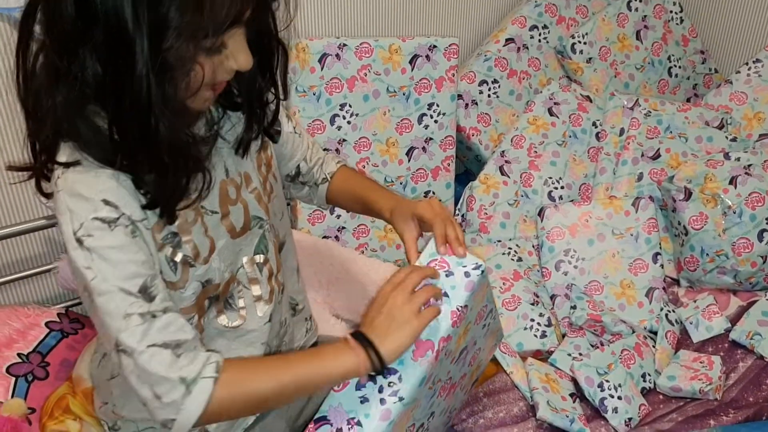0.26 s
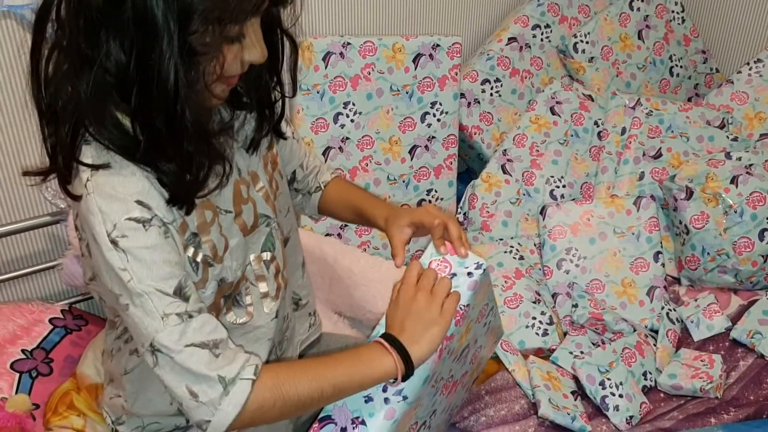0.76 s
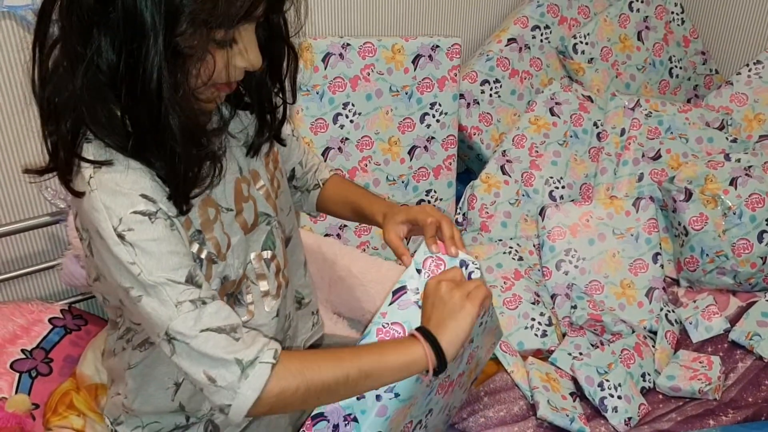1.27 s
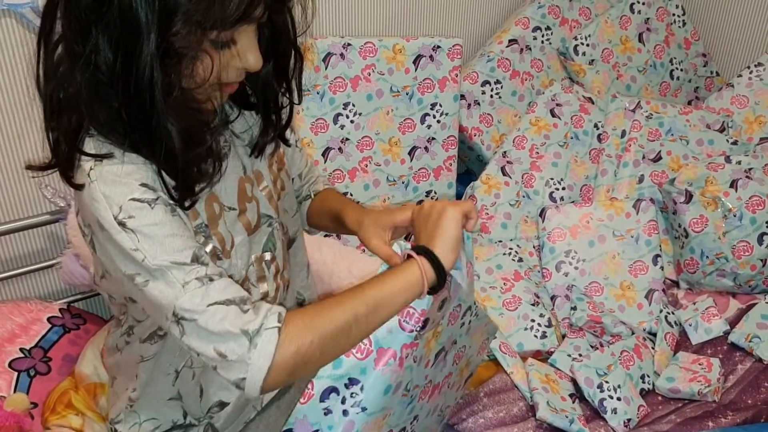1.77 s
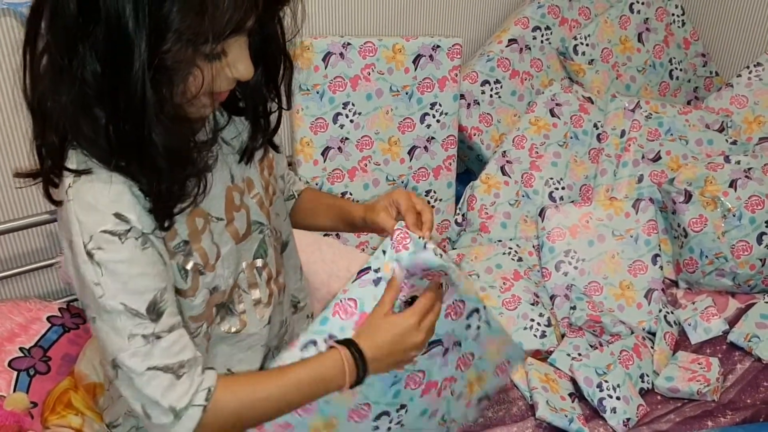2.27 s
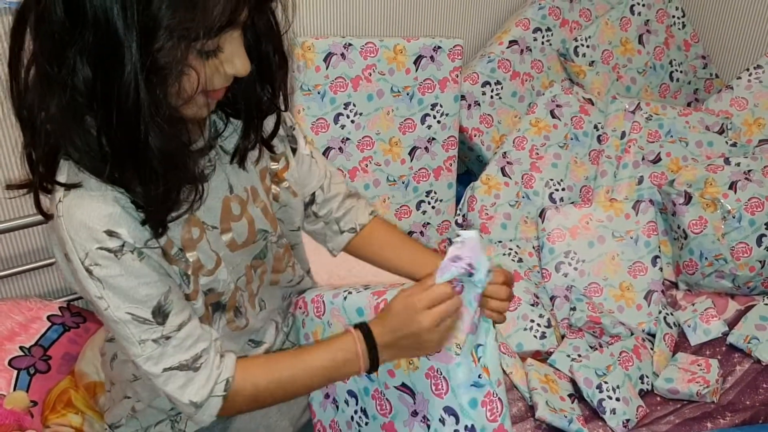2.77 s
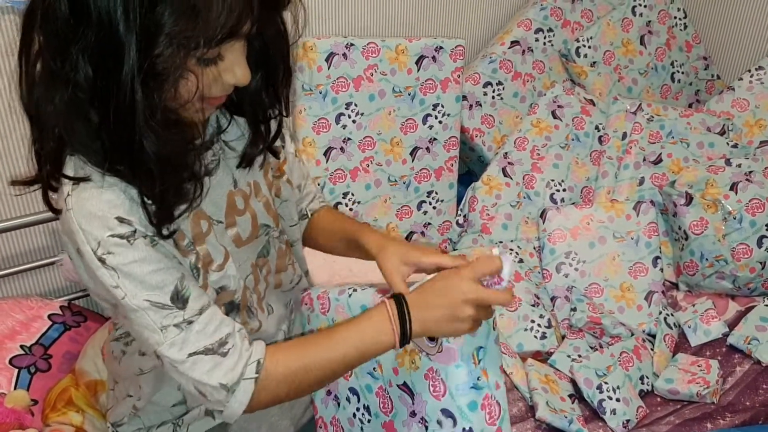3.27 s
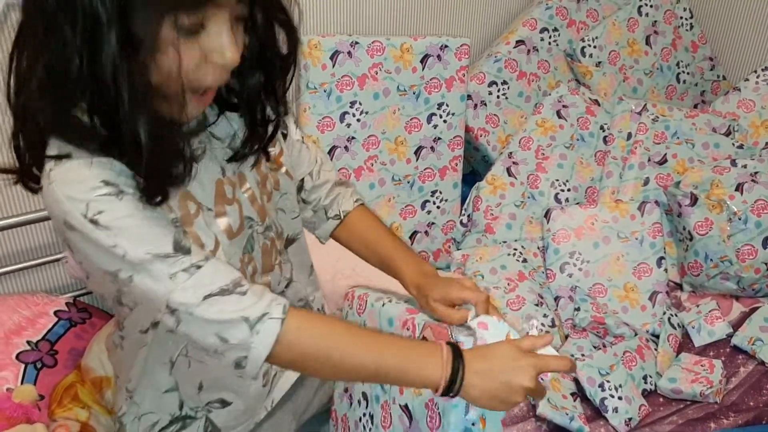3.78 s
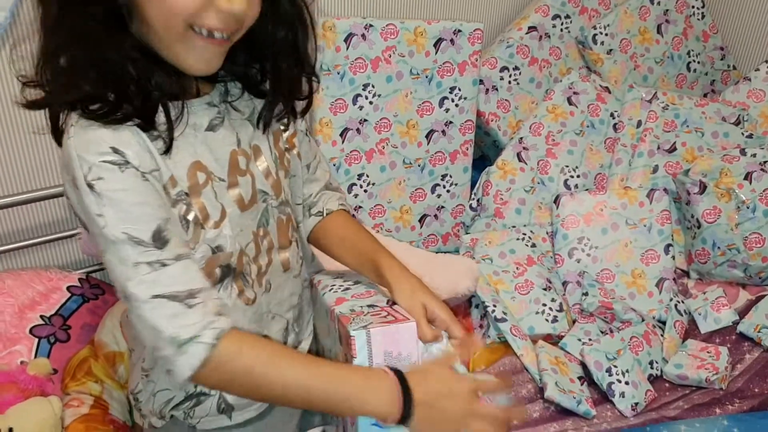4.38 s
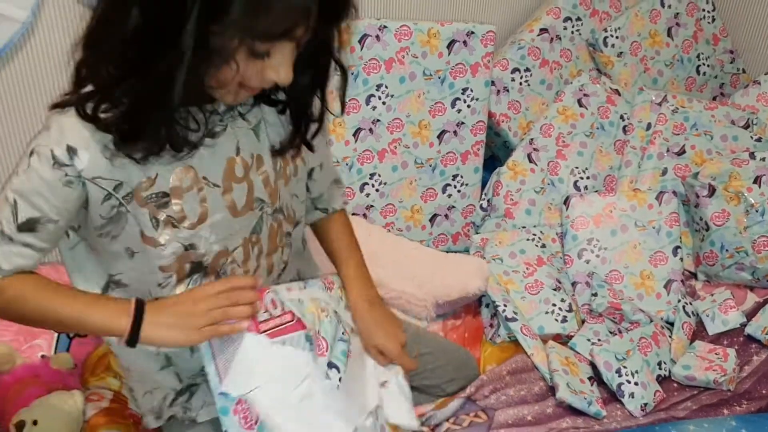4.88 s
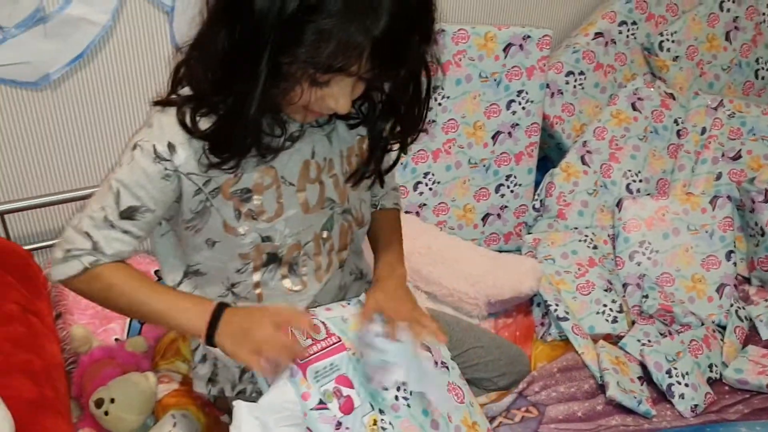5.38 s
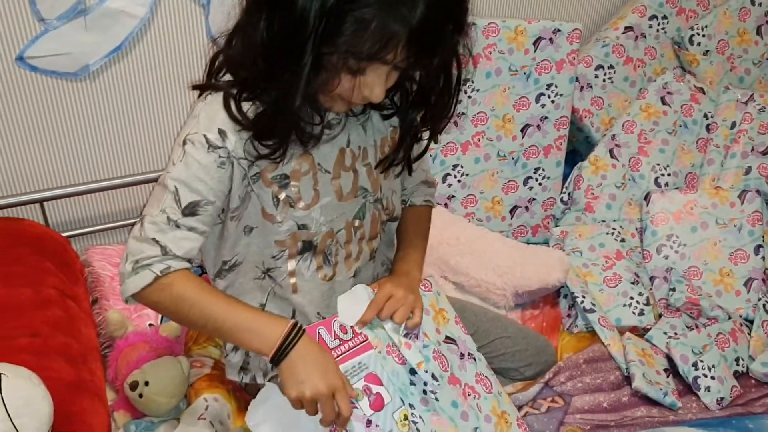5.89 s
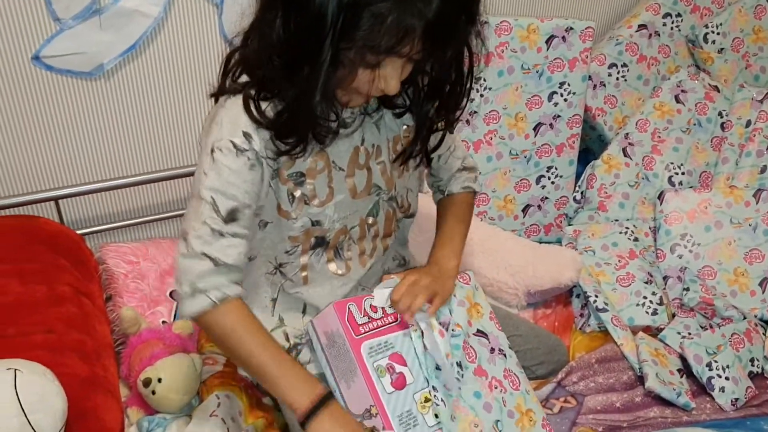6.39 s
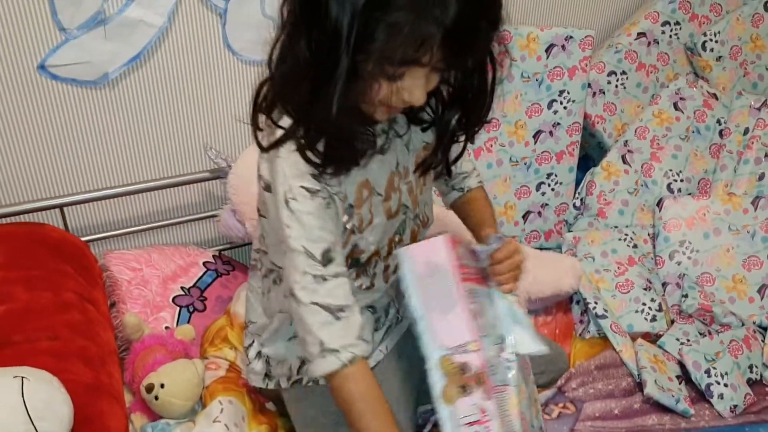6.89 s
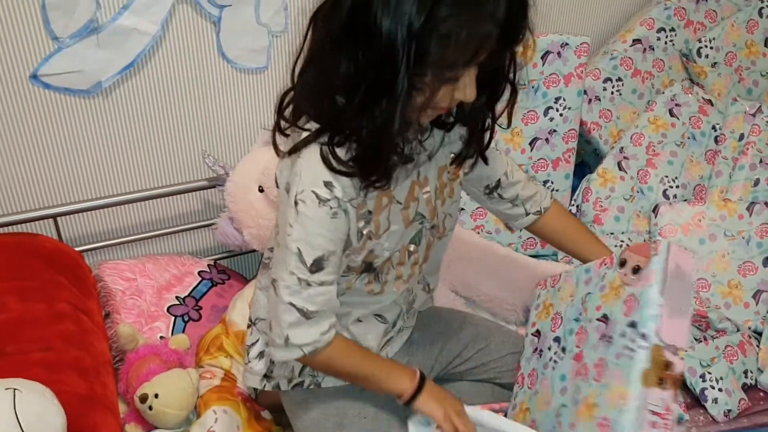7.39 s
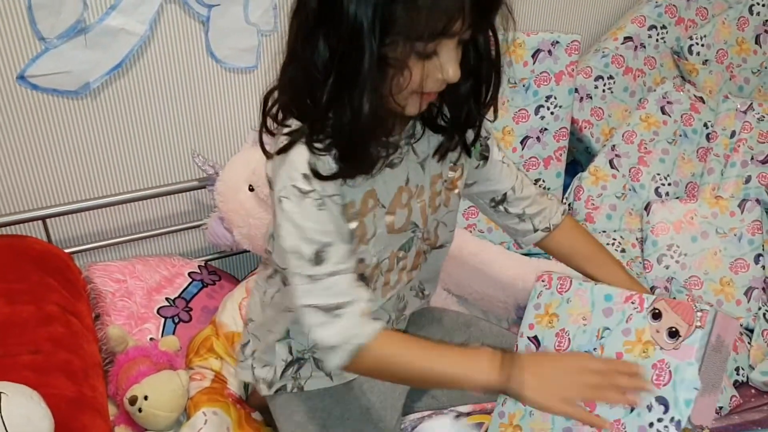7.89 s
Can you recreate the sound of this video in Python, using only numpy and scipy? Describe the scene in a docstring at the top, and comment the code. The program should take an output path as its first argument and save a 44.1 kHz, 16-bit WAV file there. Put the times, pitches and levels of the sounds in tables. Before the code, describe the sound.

Gift paper tears in irregular pulls: a few early rips, scattered pops and crumples, a big fierce rip halfway through, a quieter lull, then busy crackling and snaps before it thins out to small rustles and light taps on a stiff lid. Muffled box knocks lie underneath. Recorded near in stereo, very dry room with a short soft reverberation and low background hiss.

```python
"""Tearing gift paper off a box

Hands tear and crumple gift paper off a cardboard box in a soft-furnished bedroom. Breaking fibres are
trains of tiny impulses filtered to the colours of paper; snaps are short decaying tones with a sharp edge.
The hollow box booms as a set of resonances under the fingers, and the stiff lid rings when tapped.
A brief decaying room answer, a steady hush and a fading hum lie beneath, heard at two microphone ports."""
import sys
import numpy as np
from scipy import signal
from scipy.fft import rfft, irfft, next_fast_len
from scipy.io import wavfile
from scipy.ndimage import uniform_filter1d, map_coordinates

SR = 44100
rng = np.random.default_rng(int(sys.argv[2]) if len(sys.argv) > 2 else 0)


def inscribe(sig):
    """Save sig as 16-bit PCM at rate SR to the path in sys.argv[1].

    A 1-D sig is mono; a 2-D sig holds one channel per row.
    Samples are clipped to [-1, 1] before scaling.
    """
    pcm = np.round(np.clip(np.atleast_2d(sig).T, -1, 1) * 32767)
    wavfile.write(sys.argv[1], SR, pcm.astype(np.int16))


N = 358533

# Resonances of the hollow carton at rest.
# Each row: centre in Hz, undamped width in Hz, nominal level in dB.
BOX = [(103, 21, -4), (212.3, 23.5, -2.5), (300, 22, 0.5), (369, 46, -2.5), (461, 133, -7)]


def tearing():
    """Stick-slip fracture: the tear runs in jerks, and a strong pull packs its breaks more densely."""
    # Spectra of the crackle, the torn edge and the broad folds.
    # Each row: frequency in Hz, relative level per Hz in dB.
    paper_colour = [(1500, -29), (2500, -7), (3500, -3.5), (5000, -5), (7500, -8.5), (12000, -40)]
    fibre_colour = [(4000, -23.5), (7000, -3.5), (9000, -5.5), (12000, -2), (15500, -8)]
    fold_colour = [(450, -54), (750, -4.5), (1300, -0.5), (2200, -2), (3200, -51)]
    effort_s, light_db, packing = 0.1, -53, 0.29  # breaks pack closer above light_db
    crinkle_db = -6.5  # over the crackle, before jerks and packing

    crackle, fibres, folds, box = handling()
    effort_db = uniform_filter1d(20 * np.log10(crackle), round(effort_s * SR))
    dense = amp(packing * (effort_db - light_db))
    jerk_db = (6.1 * slips(55) + 1.7 * wobble(140)) / (1 + 1.15 * dense)
    jerk = amp(jerk_db)

    def breaks(colour, count, spread_db, smooth):
        train = jerk * cracks(count, spread_db, smooth)
        return unit(filtered(train, lambda hz: amp(along(colour, hz))))

    sheet = breaks(paper_colour, count=9000, spread_db=3.0, smooth=0.84 * dense)
    edge = breaks(fibre_colour, count=7000, spread_db=2.0, smooth=0.68 * dense)
    fold = breaks(fold_colour, count=5000, spread_db=5.0, smooth=1.44 * dense)
    body = boom(jerk * cracks(count=3000, spread_db=2.5, smooth=0.28))
    torn = patchy(crackle * sheet + fibres * edge + folds * fold, patch_db=1.64)
    crinkle_gain = crackle * amp(crinkle_db + jerk_db) / np.sqrt(1 + dense)
    return torn + box * body + crinkle_gain * crinkles(count=1500)


def handling():
    """Incoherent sources add in power: gains of crackle, fibres, folds and box, pulls over rustle."""
    # Pulls on the paper. Each row: start in seconds, rise in seconds (at least 1 ms), hold in seconds,
    # crackle level in dB, then relative to the crackle: thin fibres, broad folds and box, all in dB.
    pulls = [(0.165, 0.022, 0.0095, -43.5, -10, -13, -9.5), (0.36, 0.037, 0.16, -32, -0.5, -14.5, -18),
             (0.819, 0.0091, 0.13, -30, -1, -12.5, -20), (1.166, 0.003, 0.044, -44, 1, -11, -25),
             (1.259, 0.0049, 0.021, -32.5, 0, -7.5, -28), (1.383, 0.0058, 0.0055, -28.5, 3.5, -6.5, -20),
             (1.427, 0.013, 0.09, -30.5, -0.5, -12.5, -23), (1.485, 0.081, 0.093, -26.5, 2, -12, -18),
             (1.856, 0.0044, 0.029, -43, -6, -3, -14), (1.944, 0.0017, 0.003, -40.5, -4.5, -3.5, -2.5),
             (1.992, 0.044, 0.11, -49, -4.5, -5.5, -6), (2.214, 0.003, 0.008, -35.5, -7, -6, -10.5),
             (2.257, 0.003, 0.11, -38, -4, -7.5, -11.5), (2.336, 0.14, 0.02, -34, 1.5, -5.5, -6),
             (2.554, 0.011, 0.006, -29.5, -1.5, -8.5, -12.5), (2.832, 0.091, 0.01, -37.5, -1.5, -7, -18),
             (2.975, 0.034, 0.13, -36, -3.5, -12, -19.5), (3.297, 0.016, 0.038, -36.5, 2.5, -7.5, -33),
             (3.41, 0.013, 0.028, -37.5, -4, -8.5, -28), (3.539, 0.0077, 0.014, -28, 2, -8, -13),
             (3.562, 0.016, 0.18, -36.5, 0.5, -8.5, -9.5), (3.761, 0.086, 0.19, -32, -1.5, -12, -21),
             (4.054, 0.021, 0.039, -39, -3, -0.5, -6.5), (4.216, 0.0062, 0.0066, -34, -3, -6, -11.5),
             (4.374, 0.019, 0.015, -36.5, -2, -9, -21), (4.515, 0.008, 0.034, -39.5, -3, -6.5, -11.5),
             (4.542, 0.049, 0.047, -19, 0, -7, -15), (4.627, 0.016, 0.16, -29.5, 1.5, -9.5, -18),
             (4.723, 0.051, 0.11, -23.5, 0, -13.5, -18.5), (4.891, 0.034, 0.083, -28.5, 1.5, -15, -16.5),
             (5.476, 0.055, 0.078, -39, -4, -8.5, -14.5), (5.64, 0.042, 0.036, -40.5, -2, -4, -12.5),
             (5.94, 0.092, 0.16, -37, -1.5, -24, -9.5), (6.19, 0.056, 0.16, -34.5, 1.5, -7.5, -14),
             (6.32, 0.044, 0.011, -30.5, 2.5, -9, -15.5), (6.388, 0.054, 0.083, -31.5, 3.5, -11.5, -26),
             (6.474, 0.082, 0.11, -26, -0.5, -10, -15), (6.673, 0.026, 0.33, -36.5, 4.5, -7, -12),
             (7.003, 0.11, 0.14, -30.5, 4, -7, -10), (8.009, 0.0065, 0.13, -42, 4, -10.5, -10)]
    # The sheet shifting between pulls. Each row: time in seconds, crackle level in dB,
    # thin fibres over that crackle in dB.
    rustle_points = [(0, -49, -9), (.12, -70.5, -8), (.3, -52, -13), (.7, -50, 0.5), (1.05, -70, -10),
                     (1.2, -60, -13), (1.75, -41, -6), (2.15, -109, 8), (2.7, -48, -5), (3.3, -46, -6),
                     (4.3, -46.5, -4), (5.1, -46.5, 1.5), (5.45, -58, 0), (5.9, -44.5, -6.5),
                     (7.35, -53, -6), (7.8, -53.5, -1), (7.98, -70, 11.5)]
    folds_db, box_db = -6.5, -8.5  # over the rustle's crackle
    release_db_per_s = 280  # every pull dies away alike once the fingers stop

    t = np.arange(N) / SR
    times, *columns = np.transpose(rustle_points)
    rustle_db, fibres_db = (np.interp(t, times, c) for c in columns)
    levels_db = [rustle_db, rustle_db + fibres_db, rustle_db + folds_db, rustle_db + box_db]
    power = amp(levels_db) ** 2
    for start, rise, hold, db, *shares_db in pulls:
        first = round(start * SR)
        since = t[first:][:SR] - start
        rise = max(rise, .001)
        swell = np.clip(since / rise, 0, 1) ** 2
        release = amp(-release_db_per_s * np.clip(since - rise - hold, 0, 1))
        gains = amp(db + np.r_[0, shares_db])
        power[:, first:][:, :SR] += np.outer(gains, swell * release) ** 2
    return np.sqrt(power)


def slips(rate):
    """Relaxation after random slips (rate a second): a log curve of mean 0 and rms 1."""
    slip_s = 0.013  # time constant: each slip starts at once and fades exponentially
    kicks = (rng.random(N) < rate / SR) * rng.exponential(size=N)
    fading = filtered(kicks, lambda hz: 1 / (1 / (slip_s * SR) + 2j * np.pi * hz / SR))
    x = np.log(0.58 + fading.clip(0))
    return unit(x - x.mean())


def cracks(count, spread_db, smooth):
    """Impulsive fracture noise: unequal breaks reach the ports apart in time; smooth adds steady noise."""
    lead_s = .00014  # widest lead of one port over the other
    u = rng.random((count, 4))
    sign = np.sign(u[:, 1] - .5)
    size = sign * amp(-spread_db * np.log(1 - u[:, 2]).clip(-4.2, 0))
    lag = (u[:, 3] - .5) * lead_s * SR
    at = [np.clip(u[:, 0] * N + side * lag, 0, N - 1).astype(int) for side in (1, -1)]
    train = unit(np.array([np.bincount(i, size, N) for i in at]))
    return (train + smooth * rng.standard_normal((2, N))) / np.sqrt(1 + smooth ** 2)


def patchy(x, patch_db):
    """Time-varying spectrum: different patches of the sheet sound, so the colour keeps shifting."""
    z = signal.stft(x, nperseg=256)[2]
    field = rng.standard_normal(z.shape[1:])
    field = uniform_filter1d(uniform_filter1d(field, 7, 0), 9, 1)
    return signal.istft(z * amp(patch_db * unit(field)), nperseg=256)[1][:, :N]


def crinkles(count):
    """Buckling of scattered small creases: damped tones at their own pitches, panned by power."""
    middle_hz, log_spread = 3760, 0.25
    u, t = rng.random((count, 3)), np.arange(SR // 200)
    hz = middle_hz * np.exp(log_spread * rng.standard_normal((count, 1)).clip(-1.6, 2))
    cycles = hz * t / SR
    size_db = -5.3 * np.log(1 - u[:, 1:2]).clip(-3, 0)
    pops = np.sin(2 * np.pi * cycles) * amp(size_db - 5 * cycles)  # 5 dB lost each cycle
    at = ((u[:, :1] * N).astype(int) + t).ravel()
    ports = []
    for side in (1, -1):
        pan = np.sqrt(.5 + side * (u[:, 2:] - .5) / 2)
        ports.append(np.bincount(at, (pops * pan).ravel(), N + SR)[:N])
    return unit(np.array(ports))


def boom(drive):
    """Modal resonance under a shifting grip: fades between slacker and tauter modes of the carton."""
    flex = 0.05  # share by which the grip shifts the modes down or up
    turn = np.pi / 4 * (1 + np.tanh(wobble(9)))
    slack, taut = (filtered(drive, modes([(hz * k, w, db) for hz, w, db in BOX]))
                   for k in (1 - flex, 1 + flex))
    return unit(np.cos(turn) * slack + np.sin(turn) * taut)


def snaps():
    """Snap-through buckling: a few cycles at the patch's pitch, a sharp edge and a short flutter."""
    # Creases giving way. Each row: time in seconds, level of the pop in dB, pitch in Hz,
    # level of the sharp edge in dB (both levels ahead of the final high-pass).
    creases = [(0.0276, -26, 4470, -56), (0.205, -27, 3330, -27), (0.3957, -16, 4000, -18),
               (0.462, -15, 3470, -32), (0.8294, -15, 3970, -20), (1.1246, -41, 3070, -57),
               (1.17, -23, 3300, -20), (1.1932, -26, 3500, -35), (1.264, -20, 3400, -10),
               (1.3813, -19, 6500, -24), (1.862, -28, 3130, -40), (1.949, -22.5, 4200, -26),
               (2.118, -31.5, 2860, -25), (2.2192, -27, 2400, -27), (2.2535, -20, 4450, -4.5),
               (2.3306, -21.5, 4300, -32), (2.4736, -11, 3700, -20), (2.487, -14, 4550, -13),
               (2.5693, -19, 3980, -18), (2.7184, -40, 2570, -32), (2.9056, -27, 3600, -38),
               (2.988, -22, 6500, -28), (3.016, -16.5, 3620, -32), (3.0787, -17, 3470, -35),
               (3.1566, -27, 3400, -15), (3.183, -18.5, 4170, -22), (3.3217, -29, 3180, -26),
               (3.4362, -24, 4320, -17), (3.5535, -17, 3500, -5), (3.9457, -10, 3760, -8),
               (4.0039, -10, 4070, -18), (4.0132, -10.5, 4030, -28), (4.0734, -20, 3560, -30),
               (4.2172, -22.5, 2980, -42), (4.519, -25, 4270, -23), (4.5815, -5.5, 4530, -28),
               (5.0913, -26.5, 4500, -43), (5.2256, -25, 11600, -27), (5.3844, -38, 6660, -30),
               (5.556, -25, 3200, -33), (5.5738, -23.5, 4050, -31), (5.6205, -28, 3180, -22),
               (5.6782, -22.5, 3000, -33), (5.7756, -26, 3020, -22), (5.8, -26, 1900, -23),
               (5.874, -34, 4060, -37), (5.9678, -20, 7030, -19), (5.9748, -27.5, 1830, -17),
               (6.0563, -14.5, 4500, -9.5), (6.089, -12.5, 7840, -11), (6.101, -9.5, 5160, -20),
               (6.1224, -7.5, 3970, -9), (6.143, -14, 3840, -23), (6.5694, -5, 3770, -22),
               (7.5165, -36.5, 1540, -42), (7.755, -29, 7500, -46), (7.883, -42, 7500, -38),
               (8.046, -23, 7800, -28)]
    out, t = np.zeros((2, N + SR)), np.arange(SR // 20) / SR
    sharp = signal.butter(2, .22, "high", output="sos")  # cutoff as a share of half the sample rate
    rise = 1 - np.exp(-t / 0.00028)
    for s, db, hz, edge_db in creases:
        lag = rng.integers(0, 3, 2)  # samples, one for each port
        pop = peaked(rise * np.sin(2 * np.pi * hz * t) * amp(-60 * t * hz / 9))  # 60 dB in 9 cycles
        for ch in (0, 1):
            hiss = rng.standard_normal(len(t))
            flutter = 0.41 * rise * hiss * amp(-60 * t / 0.019)
            burst = hiss * amp(-60 * t / 0.0058) + 3 * (t == 0)
            edge = peaked(signal.sosfilt(sharp, burst))
            out[ch, round(s * SR) + lag[ch]:][:len(t)] += amp(db) * (pop + flutter) + amp(edge_db) * edge
    return filtered(out[:, :N], lambda hz: 1 / (1 - 1j * 900 / (hz + 1)))  # high-pass near 900 Hz


def knocks():
    """Modal excitation by a fingertip, each time on another spot; slower pushes reach only lower modes."""
    # Fingers on the box. Each row: time in seconds, peak level in dB,
    # length of the push in milliseconds (at least 0.5).
    touches = [(0.047, -41, 1.1), (0.362, -35, 1.5), (0.379, -26.5, 1.9), (0.458, -32.5, 2),
               (1.521, -34.5, 2.1), (2.2625, -24.5, 4), (2.312, -26.5, 2.2), (3.586, -29.5, 1.7),
               (3.96, -28.5, 1.5), (5.527, -34.5, 4), (6.433, -24, 1.3), (6.916, -30.5, .6),
               (7.712, -42.5, 2.1), (8.016, -39, 4.7)]
    # The struck wall itself. Each row: centre in Hz, undamped width in Hz, nominal level in dB.
    wall = [(840, 70, -4)]
    damping = 1.27  # the resting finger widens the modes it strikes
    out, t_ms = np.zeros(N + SR), np.arange(SR // 4) / SR * 1000
    for s, db, ms in touches:
        push = -np.sin(np.pi * np.clip(t_ms / max(ms, .5), 0, 1) ** .5)
        struck = [(hz, w * damping, level + rng.normal(0, 2.6)) for hz, w, level in [*BOX, *wall]]
        ring = filtered(push, modes(struck))[:len(t_ms)]
        out[round(s * SR):][:len(t_ms)] += amp(db) * peaked(ring)
    return out[:N]


def taps():
    """Free vibration: a knuckle on the stiff lid rings its few modes, with a burst of contact noise."""
    # Taps on the bare lid. Each row: time in seconds, level in dB to which the lid levels add.
    tap_events = [(4.12, -39), (7.5386, -46.5), (7.672, -48)]
    # Modes of the lid. Each row: frequency in Hz, level over the tap in dB.
    lid_modes = [(430, 3), (1150, 11), (1750, 2)]
    lid_t60, contact_t60 = 0.035, 0.0072  # seconds to fall by 60 dB
    out, t = np.zeros(N + SR), np.arange(SR // 8) / SR
    for s, db in tap_events:
        ring = sum(amp(level) * np.sin(2 * np.pi * hz * t) for hz, level in lid_modes)
        contact = amp(db + 10 - 60 * t / contact_t60) * rng.standard_normal(len(t))
        out[round(s * SR):][:len(t)] += amp(db - 60 * t / lid_t60) * ring + contact
    return out[:N]


def room(x):
    """Reverberation from bedding and walls: each frequency decays at its own rate, apart at each port."""
    # Reverberation times. Each row: frequency in Hz, time to fall by 60 dB in seconds.
    decay_times = [(200, 0.37), (2000, 0.2), (12000, 0.085)]
    hz, t, z = signal.stft(rng.standard_normal((2, SR // 2)), SR, nperseg=256)
    decay = amp(-60 * t / along(decay_times, hz)[:, None])
    tail = signal.istft(z * decay, SR, nperseg=256)[1]
    delayed = np.pad(x, ((0, 0), (150, 0)))  # samples before the answer begins
    return signal.fftconvolve(delayed, tail / np.linalg.norm(tail[0]), axes=1)[:, :N]


def air():
    """Stationary filtered noise: the hush of room and microphone, with a faint narrow hum fading away."""
    # Colour of the hush. Each row: frequency in Hz, relative level per Hz in dB.
    hush_colour = [(25, -5), (120, 0.5), (200, -22), (2000, -22), (6000, -24), (15500, -29)]
    # Fading of the hum. Each row: time in seconds, level in dB.
    hum_fade = [(0, -52.5), (.3, -66), (.4, -83)]
    # Resonance of the hum, applied twice. Each row: centre in Hz, width of one pass in Hz,
    # relative level of one pass in dB.
    hum_band = [(1200, 290, 0)]
    noise = rng.standard_normal((2, N))
    hush = amp(-64.5) * unit(filtered(noise, lambda hz: amp(along(hush_colour, hz))))
    hum = unit(filtered(rng.standard_normal((2, N)), lambda hz: modes(hum_band)(hz) ** 2))
    return hush + amp(np.interp(np.arange(N) / SR, *np.transpose(hum_fade))) * hum


def modes(table):
    """Modal superposition: resonances of alternating sign on a body too small to radiate deep bass."""
    def response(f):
        total = 0
        for k, (c, w, db) in enumerate(table):
            total = total + (-1) ** k * amp(db) * 1j * f * w / (c * c - f * f + 1j * f * w)
        return (f / (f + 90)) ** 2 * total
    return response


def filtered(x, response):
    """Linear filtering: the spectrum of x times a complex response of frequency."""
    m = next_fast_len(N + SR // 2)
    return irfft(rfft(x, m) * response(np.fft.rfftfreq(m, 1 / SR)), m)[..., :N]


def wobble(rate):
    """Band-limited random motion: a smooth curve through rate random knots a second."""
    knots = rng.standard_normal(int(N * rate / SR) + 4)
    return map_coordinates(knots, [np.arange(N) * rate / SR])


def along(points, hz):
    """Interpolation of (Hz, value) points on a logarithmic frequency axis."""
    f, v = np.transpose(points)
    return np.interp(np.log(hz + 1), np.log(f + 1), v)


def amp(db):
    """Logarithmic level to linear gain: 20 dB for each factor of ten."""
    return 10 ** (np.asarray(db) / 20)


def unit(x):
    """Energy normalisation: scaled to rms 1."""
    return x / np.sqrt(np.mean(x ** 2) + 1e-20)


def peaked(x):
    """Peak normalisation: scaled to peak 1."""
    return x / np.abs(x).max()


def scene():
    """Superposition of direct sound, room answer and hush; small light sources radiate no deep bass."""
    sources = np.array([tearing(), snaps() + knocks() + taps()])
    near, clicks = filtered(sources, lambda hz: hz ** 3 / (hz ** 3 + 85 ** 3))
    return near + clicks + room(amp(-7.5) * near + amp(-3.0) * clicks) + air()


def record(dry):
    """Mid-side pickup: close ports share the bass, each has its own tone, and the top is band-limited."""
    # Difference between the ports. Each row: frequency in Hz, gain of the side signal in dB.
    side_gain = [(30, -6.5), (120, -6.5), (300, -9.5), (700, -1), (3000, -1), (10000, -0.5)]
    # Tonal balance of the ports. Each row: frequency in Hz, left gain minus right gain in dB.
    lean = [(60, 3.5), (240, 0.5), (950, 1), (3770, -2.5), (15000, 4.5)]
    top_hz = 15900
    mid_side = np.array([dry[0] + dry[1], dry[0] - dry[1]]) / 2
    mid, side = filtered(mid_side, lambda hz: [1 + 0 * hz, amp(along(side_gain, hz))])
    ports = np.array([mid + side, mid - side])
    return filtered(ports, lambda hz: amp(np.outer([.5, -.5], along(lean, hz))) * (hz < top_hz))


dry = scene()
out = record(dry)
inscribe(out)
```